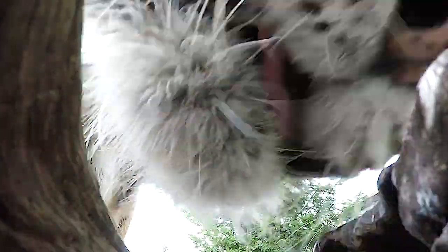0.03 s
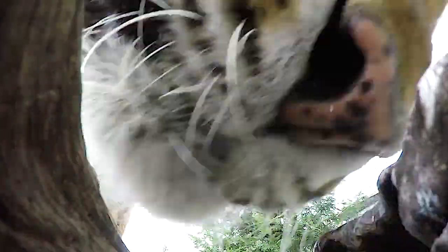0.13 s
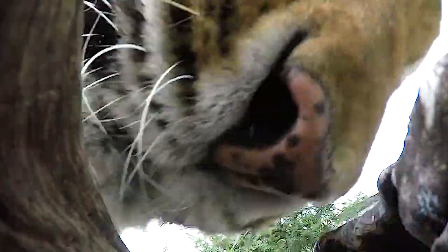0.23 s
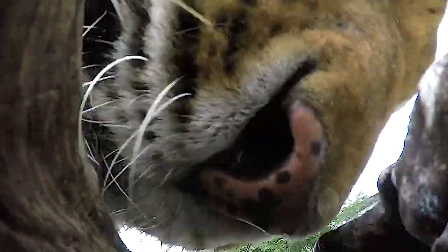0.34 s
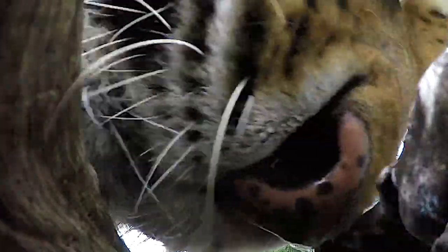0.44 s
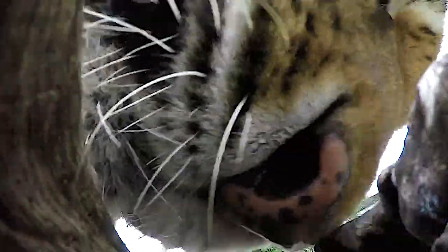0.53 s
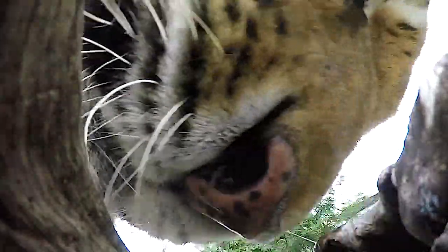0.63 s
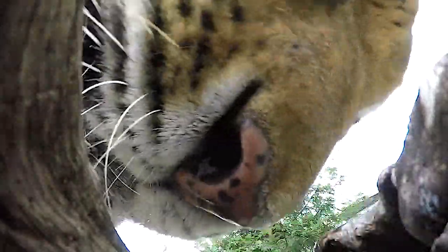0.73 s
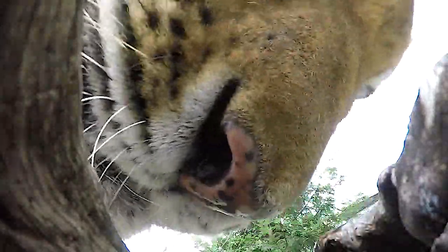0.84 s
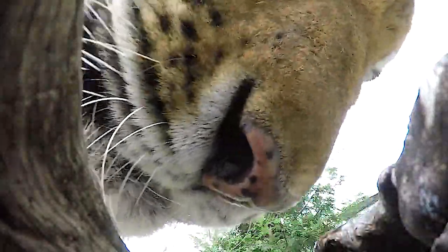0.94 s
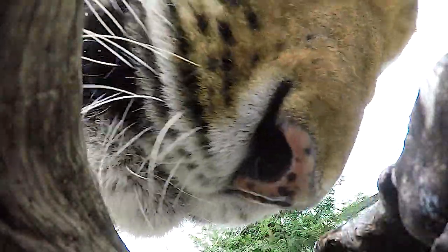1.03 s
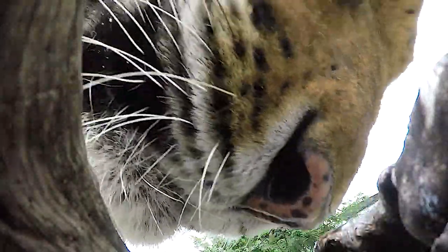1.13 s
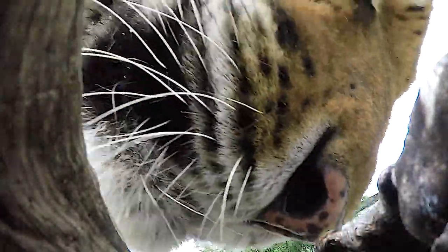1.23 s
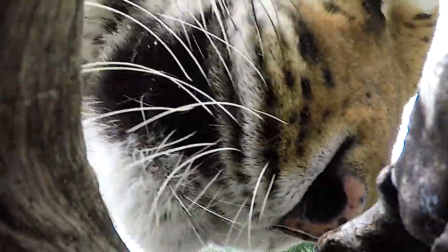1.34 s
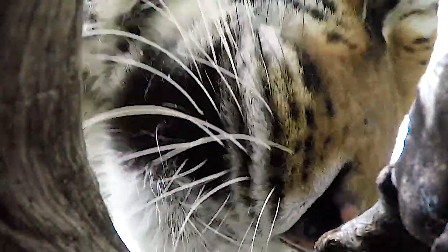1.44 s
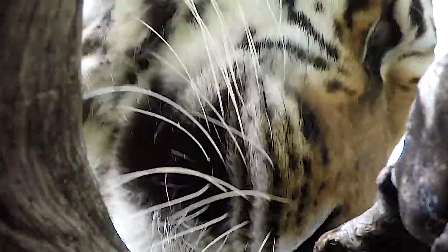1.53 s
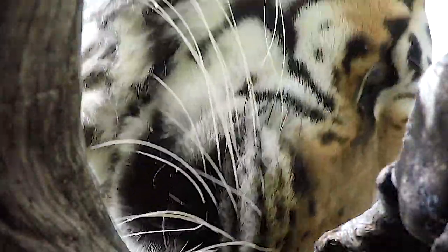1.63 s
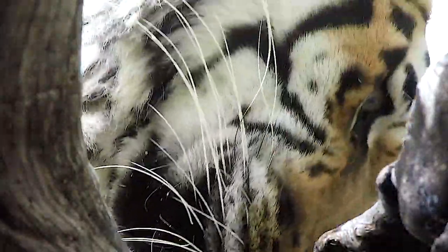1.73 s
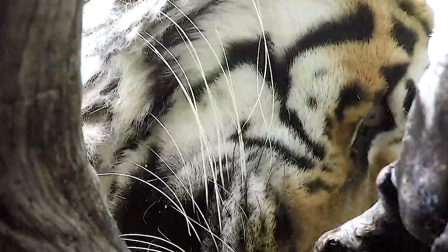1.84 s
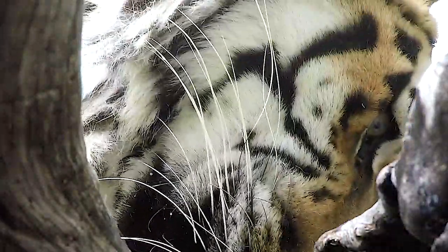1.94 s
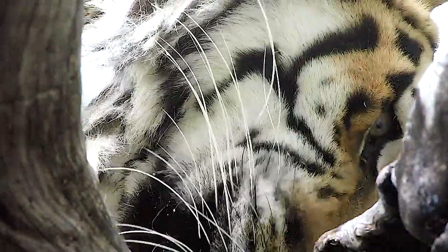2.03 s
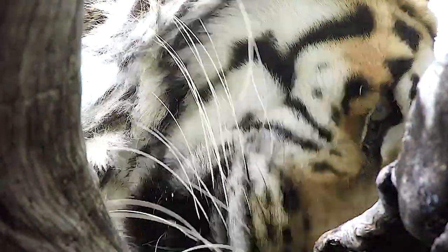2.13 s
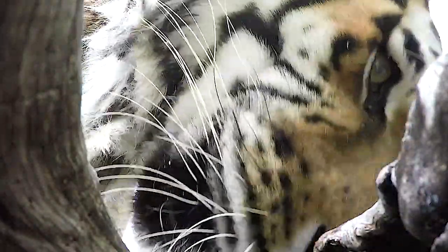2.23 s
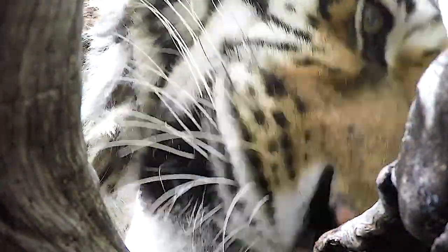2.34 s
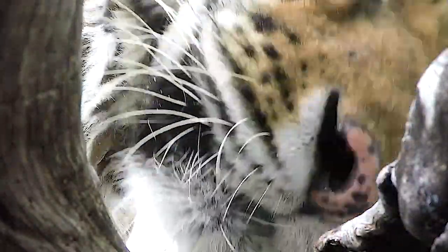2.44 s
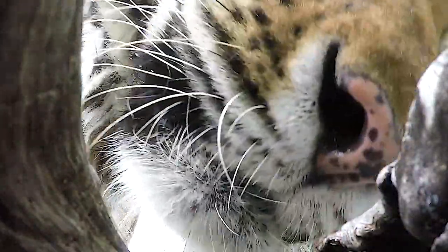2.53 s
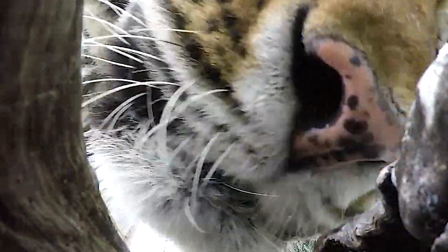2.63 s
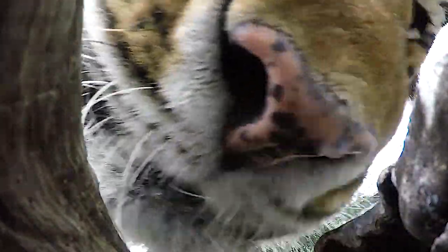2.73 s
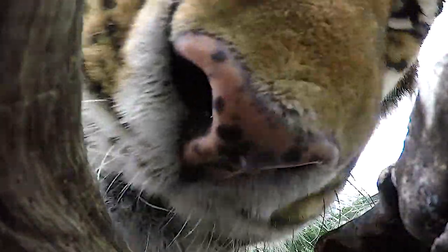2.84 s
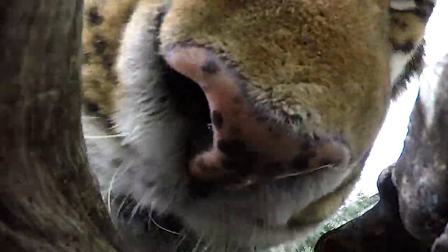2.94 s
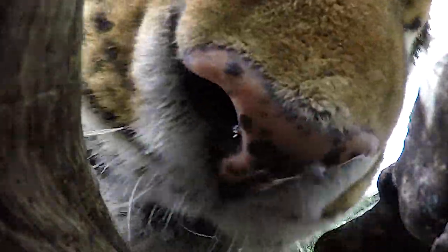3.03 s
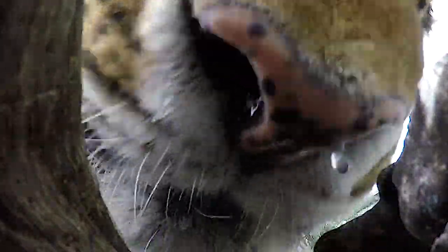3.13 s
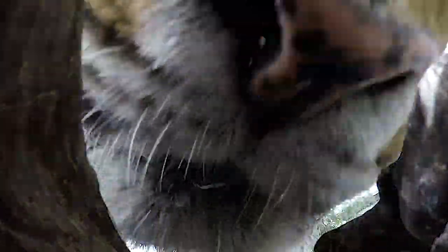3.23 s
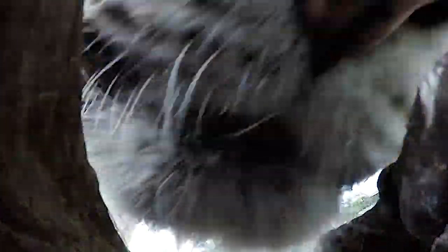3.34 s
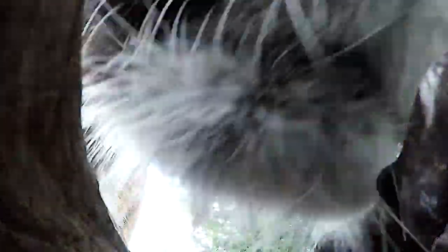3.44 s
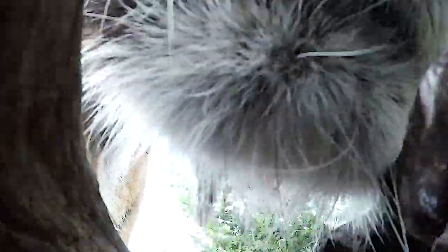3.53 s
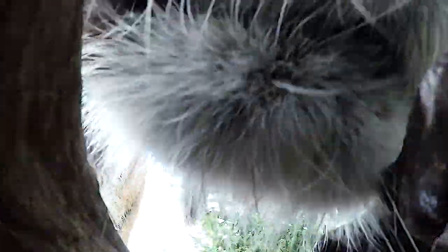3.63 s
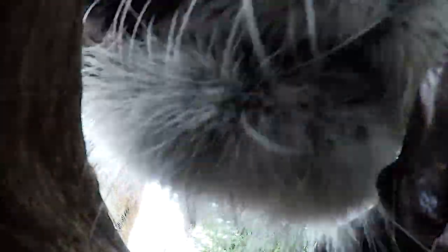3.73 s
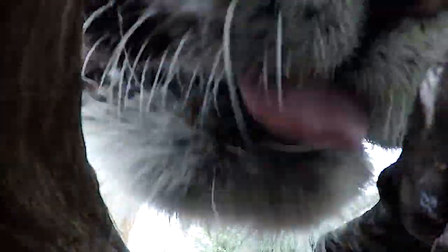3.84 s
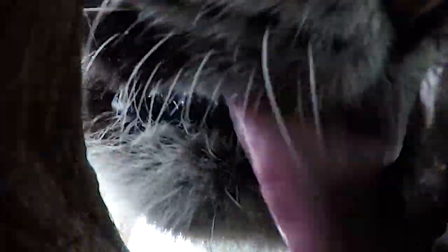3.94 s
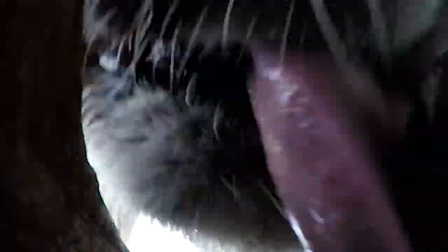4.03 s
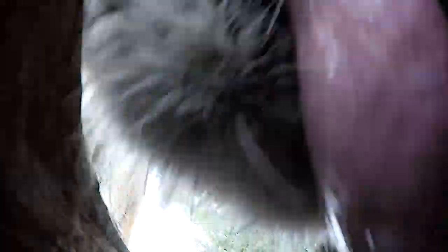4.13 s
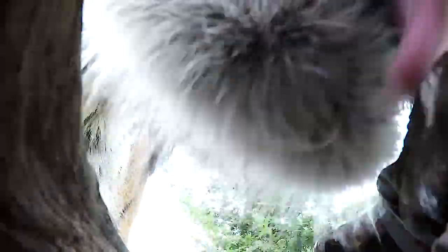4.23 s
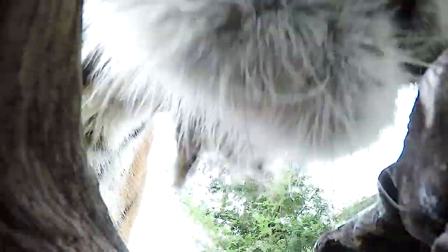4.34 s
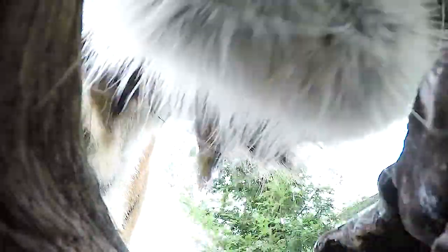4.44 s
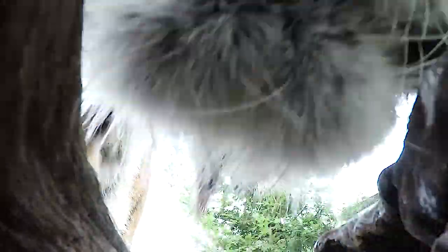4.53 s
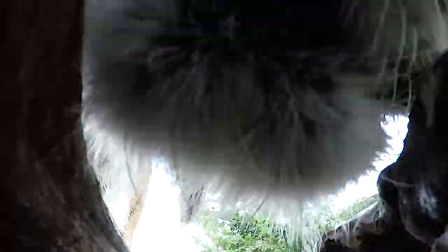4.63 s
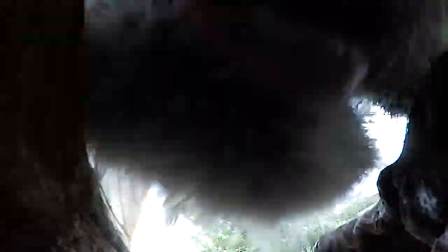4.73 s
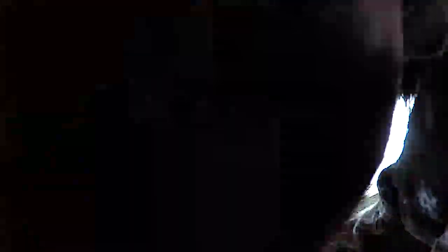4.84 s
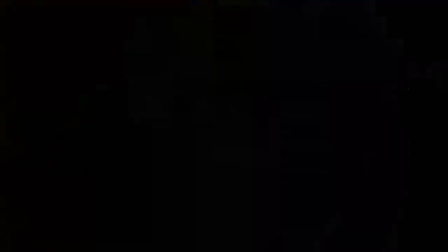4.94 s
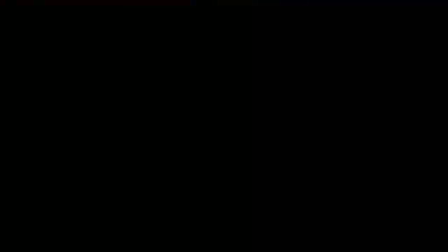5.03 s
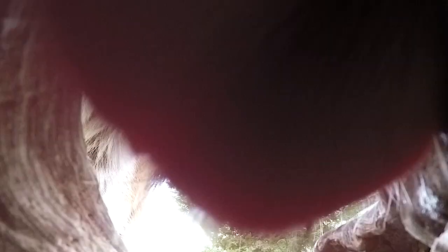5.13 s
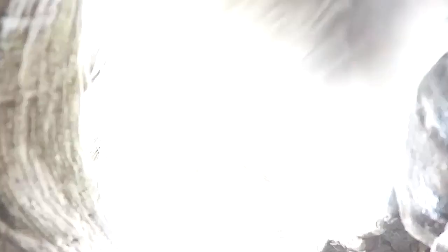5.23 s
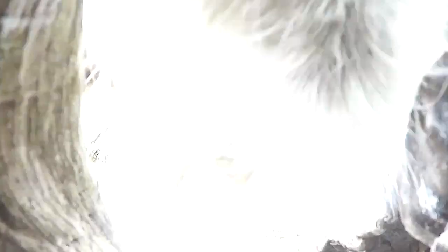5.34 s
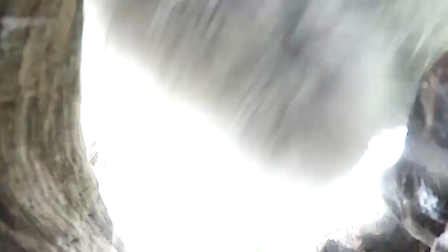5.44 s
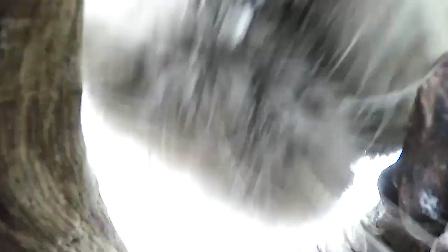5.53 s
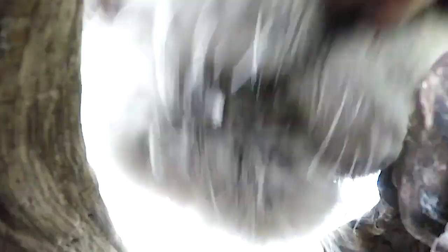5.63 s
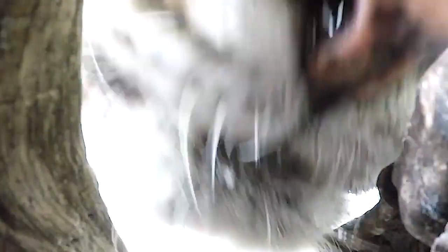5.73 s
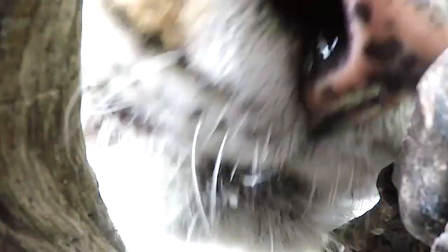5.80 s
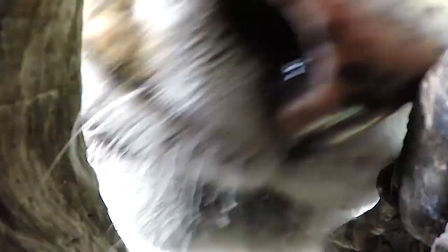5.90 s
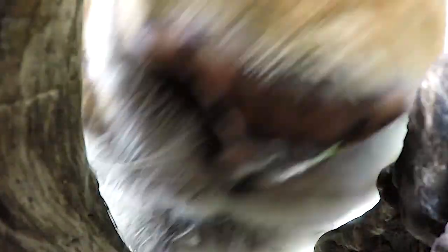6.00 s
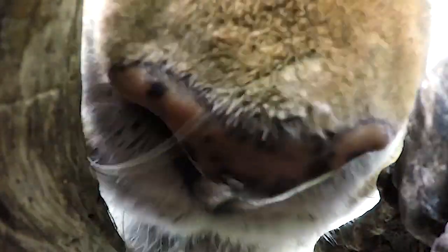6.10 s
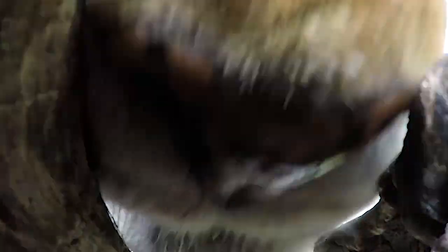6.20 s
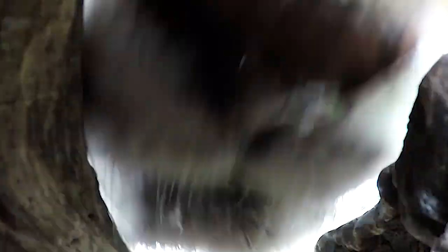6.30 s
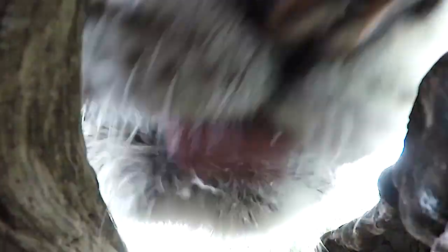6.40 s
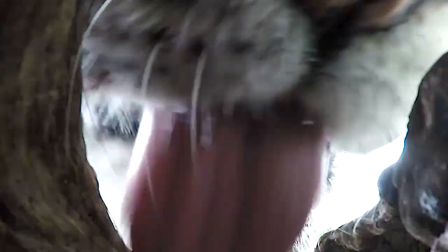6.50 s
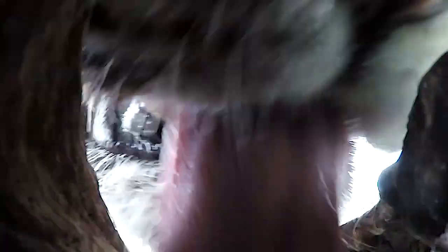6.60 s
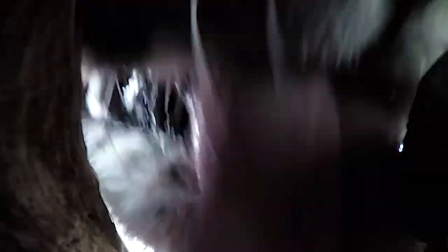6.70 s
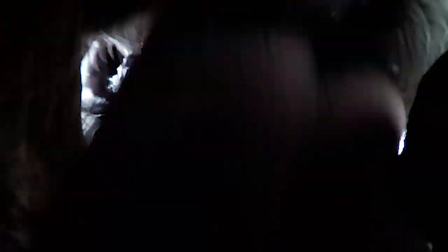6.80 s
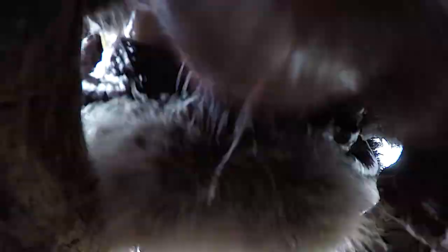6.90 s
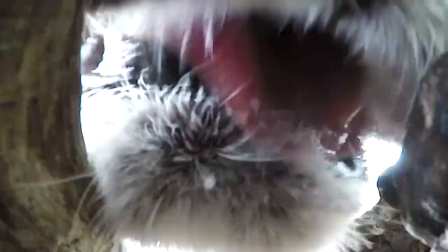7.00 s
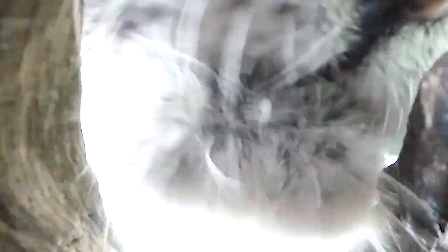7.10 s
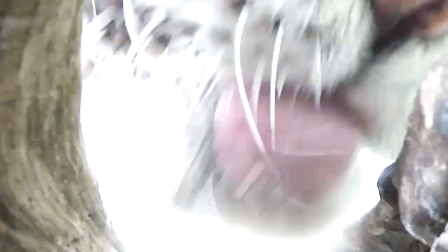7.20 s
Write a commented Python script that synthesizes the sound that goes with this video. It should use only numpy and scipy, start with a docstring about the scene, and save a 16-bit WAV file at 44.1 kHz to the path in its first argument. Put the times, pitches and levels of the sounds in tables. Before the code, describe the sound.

Big cat mouth and nose sounds at touching distance, dry and without echo: a light lick and saliva crackle, several soft nostril sniffs over a low wavering hum, then a blunt snort with a rasping lick. The loudest tongue stroke sticks and slips across the microphone, followed by a short quiet gap, then thumps, a second snort, wet rasping and a final cluster of sharp smacks over faint outdoor hiss.

```python
"""A tongue rasps past and wet lips smack: a tiger noses and licks a small camera wedged between logs outdoors.
Its housing drones at a hollow resonance when brushed, as low noise bands over a faint outdoor hiss.
Snuffs and snorts are shaped air noise, rasps are barb clicks on film noise, and smacks are crackles that ring bubbles.
Muzzle and jaw bump as decaying sines; one drag right over the microphone ports sticks, slips and judders."""
import sys
import numpy as np
from scipy import signal
from scipy.fft import rfft, irfft, next_fast_len
from scipy.io import wavfile
from scipy.ndimage import uniform_filter1d

SR = 44100
rng = np.random.default_rng(int(sys.argv[2]) if len(sys.argv) > 2 else 0)


def materialize(psi):
    """Save the field psi as 16-bit PCM at rate SR to the path in sys.argv[1].

    A 1-D psi becomes a single channel; in a 2-D psi each row is a channel.
    """
    bounded = np.clip(np.atleast_2d(psi).T, -1, 1)
    quanta = np.round(bounded * 32767).astype(np.int16)
    wavfile.write(sys.argv[1], SR, quanta)


N = 320166   # length in samples

# Snuffs from a little way off; air that reaches the housing makes it drone. Levels are before each layer's trim.
# Each row: start in seconds, length in seconds, air in dB, hollow note in dB, drone in dB,
# how squarely the nose faces the ports (0-1).
SNUFFS = [(.37, 0.14, -59, -74, -40, .1), (0.736, 0.15, -50, -42.5, -23.5, 0.2),
          (1.07, .16, -60.5, -65, -50, 0), (1.546, 0.076, -54.5, -55.5, -28.5, 0.2),
          (1.692, 0.086, -61, -64, -45, 0.16), (2.255, .19, -42.5, -45, -22.5, 0.37),
          (2.543, 0.09, -59.5, -70, -33.5, .02), (2.97, 0.13, -61, -73, -60, 0.5),
          (3.214, 0.039, -49.5, -51, -20, 0.9), (3.336, 0.085, -56, -70, -49, .95)]
# Snorts straight on to the housing. Each row: start in seconds, length in seconds, fall by 20 dB in seconds,
# air in dB, drone in dB, rumble in dB, all before each layer's trim.
SNORTS = [(4.158, 0.16, 0.096, -29, -11.5, -35.5), (6.357, 0.23, 0.3, -26.5, -13.5, -35)]
# Tongue strokes, a firm press within a longer light touch. Each row: press start in seconds, length in seconds,
# level in dB, growth along the press in dB, touch before it in seconds, touch after it in seconds, touch level in dB,
# barb flicks per second, lean of the treble to the left in dB.
LICKS = [(0, 0.13, -45, -1, 0, 0.1, -55.5, 2800, 0.5),
         (4.154, 0.087, -29.5, 1.5, 0.23, 0.16, -46.5, 3300, 7.5),
         (4.781, 0.067, -48.5, 0, 0.12, .06, -58, 2900, 6),
         (4.976, 0.24, -28.5, -1.5, 0.019, .005, -50, 3000, 7),
         (6.741, 0.178, -34.5, 10.5, 0.0054, 0.086, -43, 1550, 2)]
# How the two ports hear a source. Each row: frequency in Hz, likeness of the ports (0-1),
# phase lead of the left in radians. First the tongue on the ports, then air from a little way off, then air close on.
TOUCH_IMAGE = [(300, 0.72, 3.5), (1290, 0.91, 2.5), (2880, 1, 1.1), (5300, 0.49, -1), (14000, 0.13, 1.5)]
SNUFF_IMAGE = [(300, 0.98, 0), (1200, 0.86, -0.12), (2630, 0.97, -1.2), (5230, 0.63, 0.77), (14000, .2, 0)]
SNORT_IMAGE = [(300, 1, -0.036), (800, 0.3, 0.2), (2000, 0.34, -1.1), (14000, 0.17, 0.17)]
# Spectrum of saliva crackle. Each row: frequency in Hz, relative level in dB per Hz.
SALIVA_COLOUR = [(600, 2), (1300, 2), (2000, -0.5), (2800, 0), (3700, -7.5), (5000, -3), (6500, -9.5),
                 (10000, -16)]

# rise and fall times span 20 dB
SNORT_RISE_S = 0.046
LICK_RISE_S, LICK_FALL_S = 0.031, 0.023
DRAG_S, DRAG_LENGTH_S = 4.968, 0.098   # the drag right on the ports


def from_db(db):
    """Decibels to gain."""
    return 10 ** (np.asarray(db) / 20)


def rms_one(x):
    """Scale to rms 1."""
    return x / np.sqrt(np.mean(x ** 2) + 1e-20)


def peak_one(x):
    """Scale to peak 1."""
    return x / (np.abs(x).max() + 1e-20)


def panned(db):
    """Left and right gains for a level difference."""
    return from_db(np.array([[.5], [-.5]]) * db)


def level(curve):
    """Gain at every sample along a level curve."""
    return from_db(np.interp(np.arange(N) / SR, *np.transpose(curve)))


def swell(s, length_s, db, rise_s, fall_s, arch_db=0, growth_db=0):
    """Gain of one gesture: it rises, holds with a bulge and a trend, and falls; rise and fall times span 20 dB."""
    first = max(int((s - 2 * rise_s) * SR), 0)
    last = min(int((s + length_s + 2 * fall_s) * SR), N)
    at = np.arange(first, last)
    t, gain = at / SR - s, np.zeros(N)
    along = np.clip(t / length_s, 0, 1) - .5
    edges_db = 20 * (np.maximum(-t, 0) / rise_s + np.maximum(t - length_s, 0) / fall_s)
    gain[at] = from_db(db - edges_db - arch_db * (2 * along) ** 2 + growth_db * along)
    return gain


def together(gains):
    """Unrelated pushes add in power."""
    return np.sqrt(sum(gain ** 2 for gain in gains))


def clumps(size, per_s, depth_db):
    """A gain that wanders at random, knot by knot."""
    knots = rng.standard_normal(int(size * per_s / SR) + 2)
    wander = np.interp(np.arange(size) * per_s / SR, np.arange(len(knots)), knots)
    return from_db(depth_db * wander)


def span(gain):
    """First sample and gain of the stretch that sounds, in whole quarter seconds."""
    block = SR // 4
    first, last = np.flatnonzero(gain)[[0, -1]] // block
    return first * block, gain[first * block:(last + 1) * block]


def add(out, start, sound):
    """Mix a sound in from a given sample on."""
    out[:, start:start + sound.shape[-1]] += sound[..., :max(N - start, 0)]


def at_bins(points, size, axis=1):
    """One column of a frequency table at every bin of a transform."""
    table = np.array(points, float)
    bins_hz = np.arange(size // 2 + 1) * SR / size
    return np.interp(np.log(bins_hz + 1), np.log(table[:, 0]), table[:, axis])


def coloured(x, colour):
    """Give a sound a smooth spectrum that drops 30 dB in the octave beyond each end; rms 1."""
    size = next_fast_len(x.shape[-1])
    closed = [(colour[0][0] / 2, colour[0][1] - 30), *colour, (colour[-1][0] * 2, colour[-1][1] - 30)]
    shaped = irfft(rfft(x, size) * from_db(at_bins(closed, size)), size)
    return rms_one(shaped[..., :x.shape[-1]])


def at_ports(three, image):
    """One shared and two private signals become what the left and right ports hear."""
    size = next_fast_len(three.shape[-1])
    spectra = rfft(three, size)
    alike, lead = np.clip(at_bins(image, size), 0, 1), at_bins(image, size, axis=2)
    shared = spectra[0] * np.exp(1j * lead * np.array([[.5], [-.5]]))
    pair = np.sqrt(alike) * shared + np.sqrt(1 - alike) * spectra[1:]
    return irfft(pair, size)[:, :three.shape[-1]]


def resonant(x, peaks):
    """Lift or dip narrow resonances in a sound, one after another."""
    for hz, width_hz, lift_db in peaks:
        r = np.exp(-np.pi * width_hz / SR)
        poles = [1, -2 * r * np.cos(2 * np.pi * hz / SR), r * r]
        peak = signal.lfilter([1, 0, -1], poles, x) * (1 - r * r) / 2
        x = x + (from_db(lift_db) - 1) * peak
    return x


def ring(x, hz, t60):
    """One decaying mode, set ringing by a sound."""
    r = from_db(-60 / (t60 * SR))
    return signal.lfilter([1, -1], [1, -2 * r * np.cos(2 * np.pi * hz / SR), r * r], x)


def band(x, low_hz, high_hz):
    """Causal band-pass."""
    edges_hz = [low_hz, min(high_hz, SR / 2 - 1000)]
    return signal.sosfilt(signal.butter(2, edges_hz, "band", fs=SR, output="sos"), x)


def flicks(size, per_s, spread_db, channels=3):
    """Random clicks of uneven strength; rms 1."""
    shape = (channels, size)
    strength = from_db(spread_db * np.minimum(rng.exponential(1, shape), 4)) * rng.choice([-1, 1], shape)
    return rms_one(strength * (rng.random(shape) < per_s / SR))


def held(x, seconds):
    """Even out the slow swells of a noise and keep its quick beating."""
    size = max(int(seconds * SR), 2)
    power = uniform_filter1d(uniform_filter1d(x ** 2, size), size)
    return x / np.sqrt(power + 1e-9)


def housing(drive, colour, level_db, even_s, apart_db):
    """Brushing shakes the housing as a whole, so both ports hear nearly the same."""
    out = np.zeros((2, N))
    start, gain = span(drive)
    noise = coloured(rng.standard_normal((2, len(gain))), colour)
    apart = from_db(apart_db) * noise[1] * [[1], [-1]]   # opposite at the two ports
    add(out, start, from_db(level_db) * gain * (held(noise[0], even_s) + apart))
    return out


def air(flow, colour, image, peaks, level_db):
    """Turbulent air through a set of resonances."""
    out = np.zeros((2, N))
    start, gain = span(flow)
    noise = coloured(at_ports(rng.standard_normal((3, len(gain))), image), colour)
    add(out, start, from_db(level_db) * gain * rms_one(resonant(noise, peaks)))
    return out


def grains(effort, colour, image, per_s, spread_db, level_db):
    """A stream of tiny clicks under one envelope, as of sticky releases."""
    out = np.zeros((2, N))
    start, gain = span(effort)
    releases = coloured(at_ports(flicks(len(gain), per_s, spread_db), image), colour)
    add(out, start, from_db(level_db) * gain * releases)
    return out


def outdoors():
    """The faint distant hiss is broad noise that dips for a moment after the drag."""
    # Each row: frequency in Hz, relative level in dB per Hz.
    hiss_colour = [(150, 8), (330, 3.5), (500, 1.5), (900, -2.5), (1250, -2.5), (2000, -11), (3100, -16),
                   (4400, -18.5), (5200, -19), (5750, -13.5), (6400, -19), (10000, -21.5), (12000, -28.5),
                   (15000, -38)]
    # Each row: time in seconds, level in dB before the trim.
    hiss_level = [(0, -46), (2, -47), (4.9, -44.5), (5.27, -48), (5.42, -49), (5.7, -45), (6.25, -45.5),
                  (7.26, -42.5)]
    # Each row: frequency in Hz, likeness of the ports (0-1), phase lead of the left in radians.
    hiss_image = [(300, .25, 5), (436, 0.65, -1.5), (650, 0.74, -3), (1180, 0.21, -2.5), (2700, 0.43, -1.6),
                  (14000, 0.072, 31)]
    return air(level(hiss_level), hiss_colour, hiss_image, [], level_db=0.5)


def body():
    """The housing drones and its mount rumbles: always a little, and more with every snuff, snort and shove."""
    # Spectra of drone and rumble. Each row: frequency in Hz, relative level in dB per Hz.
    drone_colour = [(70, -44), (105, -32), (140, -17), (172, -7), (202, -1), (232, -5.5), (270, -16.5),
                    (320, -26.5), (420, -40), (700, -52.5)]
    rumble_colour = [(22, -33), (32, -22), (45, -14.5), (65, -1.5), (90, -1.5), (135, 0), (250, -32)]
    # Resting drone, which sinks for a moment after the drag. Each row: time in seconds, level in dB before the trim.
    drone_rest = [(0, -31), (1.9, -31), (3.05, -31.5), (3.7, -27.5), (4.95, -28), (5.15, -40),
                  (5.34, -40.5), (5.46, -31.5), (6.1, -28), (7.26, -31)]
    # Resting rumble of the mount, stronger as the head leans closer. Each row: time in seconds, level in dB.
    rumble_rest = [(0, -47), (.7, -47), (1.95, -59), (3.2, -45.5), (4.7, -41), (5.25, -46.5), (6.25, -42.5),
                   (6.8, -37), (7.26, -41.5)]
    # The muzzle shoves the housing. Each row: start in seconds, length in seconds, drone in dB before the trim,
    # rumble in dB.
    shoves = [(0.227, 0.092, -26.5, -52), (3.794, 0.063, -19, -35), (4.352, .045, -36, -26.5),
              (4.972, 0.1, -23.5, -31), (5.689, 0.072, -22.5, -36.5), (6.917, 0.012, -22.5, -46),
              (6.993, 0.13, -28, -44)]
    wavers_per_s, waver_db = 13, 1.74   # the resting drone wavers
    lag_s, rise_s, fall_s = 0.014, 0.029, 0.06   # the housing answers a snuff a little late
    shove_rise_s, shove_fall_s = .035, 0.064

    drone = [level(drone_rest) * clumps(N, wavers_per_s, waver_db)]
    rumble = [level(rumble_rest)]
    for s, length, _, _, drone_db, _ in SNUFFS:
        drone.append(swell(s + lag_s, length, drone_db, rise_s, fall_s, growth_db=-2))
    for s, length, fall, _, drone_db, rumble_db in SNORTS:
        drone.append(swell(s, length, drone_db, SNORT_RISE_S, fall, arch_db=0.5))
        rumble.append(swell(s, length, rumble_db, SNORT_RISE_S, fall, growth_db=-8))
    for s, length, drone_db, rumble_db in shoves:
        push = swell(s, length, 0, shove_rise_s, shove_fall_s)
        drone.append(from_db(drone_db) * push)
        rumble.append(from_db(rumble_db) * push)
    return (housing(together(drone), drone_colour, level_db=-1.5, even_s=0.037, apart_db=-23.0)
            + housing(together(rumble), rumble_colour, level_db=0.0, even_s=0.014, apart_db=-22))


def bumps(soft_s=0.0057):
    """Padded knocks of muzzle and jaw swell softly and die away in the housing as decaying sines."""
    # Each row: start in seconds, peak of the envelope in dB before the band-pass, frequency in Hz, t60 in seconds.
    knocks = [(.143, -17, 210, 0.044), (0.244, -11.5, 214, 0.043), (.312, -21.5, 201, 0.067),
              (0.765, -22, 197, 0.14), (3.435, -26, 210, .06), (3.788, -15, 210.4, 0.14),
              (3.836, -24, 150, 0.026), (4.368, -22, 90, 0.064), (5.04, -14.5, 131, 0.052),
              (5.695, -13, 197, 0.098), (6.425, -15, 134, 0.043), (6.477, -4, 170, 0.022),
              (6.585, -13.5, 155, 0.018), (6.927, -12, 190, 0.073), (6.985, -15.5, 111, 0.021),
              (7.079, -14.5, 132, 0.033), (7.168, -13.5, 204, 0.039)]
    out, t = np.zeros((2, N)), np.arange(SR // 5) / SR
    for s, db, hz, t60 in knocks:
        envelope = (1 - np.exp(-(t / soft_s) ** 2)) * from_db(-60 * t / t60)
        add(out, int(s * SR), from_db(db) * envelope / envelope.max() * np.sin(2 * np.pi * hz * t))
    return band(out, low_hz=76.6, high_hz=2000)   # keep the knocks free of deep bass


def nose():
    """Snuffs hiss through the nostrils over a hollow note; snorts blow straight on to the case and buffet the ports."""
    # Spectra of a snuff past the ports, one aimed squarely at them (it misses the nostril resonances),
    # the hollow note, and the buffet of a snort. Each row: frequency in Hz, relative level in dB per Hz.
    snuff_colour = [(200, -31), (330, 0), (480, 4), (600, -17), (900, -23.5), (1400, -2.5), (1900, -13),
                    (2800, -6), (3300, -30), (4500, -16.5), (7500, -14.5), (10000, -18), (14000, -41)]
    square_colour = [(330, 7), (480, 4), (750, -13), (1400, -3.5), (2400, -11), (3100, -9.5), (3800, -12.5),
                     (5600, -8.5), (9500, -18), (14000, -38)]
    hollow_colour = [(300, 11), (380, 6), (600, -17.5), (700, -3), (900, -25), (1110, 1.5), (1400, -14),
                     (1800, -25)]
    buffet_colour = [(90, -14), (135, 5), (165, 3), (220, -22.5), (500, -65)]
    # One such spectrum for each snort, with the same columns.
    snort_colours = [
        [(200, -10), (320, -2), (470, 5), (600, -11), (880, -14.5), (1300, -11), (2300, -26), (3600, -30),
         (4700, -32), (5700, -19.5), (8000, -31), (11000, -42), (14000, -57)],
        [(160, -34), (280, -14), (294, -13), (359, 1.5), (404, -6.5), (439, -1.5), (722, -20.5), (1290, -22.5),
         (1450, -20.5), (1890, -31.5), (3810, -29), (5770, -29.5), (7400, -38), (12600, -48.5), (14900, -64)],
    ]
    # Resonances of the nostrils. Each row: frequency in Hz, width in Hz, lift in dB.
    nostrils = [(760, 81, 17), (1125, 130, 9.5), (2490, 180, 11.5), (3800, 120, 16.5), (5600, 290, 7)]
    rise_s, fall_s, arch_db = 0.058, 0.057, 4.5   # the arch is the bulge at mid-length
    hollow_rise_s, hollow_fall_s = 0.2, 0.084   # the slack nostril opens before the snuff and closes after it

    past, square, slack = [], [], []
    for s, length, db, hollow_db, _, facing in SNUFFS:
        flow = swell(s, length, db, rise_s, fall_s, arch_db)
        facing = np.clip(facing, .01, .99)
        past.append(flow * np.sqrt(1 - facing))
        square.append(flow * np.sqrt(facing))
        slack.append(swell(s, length, hollow_db, hollow_rise_s, hollow_fall_s, arch_db=5))
    out = (air(together(past), snuff_colour, SNUFF_IMAGE, nostrils, level_db=6.0)
           + air(together(square), square_colour, SNUFF_IMAGE, [], level_db=5.5)
           + air(together(slack), hollow_colour, SNUFF_IMAGE, [], level_db=6.5))
    for (s, length, fall, db, drone_db, _), colour in zip(SNORTS, snort_colours):
        blast = swell(s, length, 0, SNORT_RISE_S, fall, arch_db=6.5)
        out += air(from_db(db) * blast, colour, SNORT_IMAGE, [], level_db=2)
        # the buffet's level is set against the snort's drone
        out += housing(from_db(drone_db) * blast, buffet_colour, level_db=-11.5, even_s=0.017, apart_db=-20)
    return out


def coat():
    """Fur sweeps past the case as soft noise and whiskers graze a port as dense clicks."""
    # Spectra of fur and whiskers. Each row: frequency in Hz, relative level in dB per Hz.
    fur_colour = [(1500, 11), (3500, -18), (7000, -26), (8500, 3), (10000, 0), (11500, -11), (14000, -18)]
    whisker_colour = [(700, 1), (1200, 0), (1600, -5), (2400, -19), (6000, -17), (12000, -35)]
    # Each row: start in seconds, length in seconds, level in dB before the trim.
    fur_sweeps = [(5.455, 0.37, -60.5), (6.351, .045, -49.5)]
    edge_share = 0.77   # a longer sweep also fades in and out more slowly
    sweeps = together(swell(s, length, db, edge_share * length, edge_share * length, arch_db=2)
                      for s, length, db in fur_sweeps)
    graze = swell(0.538, length_s=0.017, db=-46, rise_s=0.063, fall_s=0.063)
    return (air(sweeps, fur_colour, SNUFF_IMAGE, [], level_db=1.5)
            + grains(graze, whisker_colour, TOUCH_IMAGE, per_s=2400, spread_db=1.0, level_db=0.5))


def mouth():
    """Each move of the tongue in the mouth squelches low and crackles with saliva, both streams of clicks."""
    # Each row: frequency in Hz, relative level in dB per Hz.
    squelch_colour = [(220, -15), (330, -3.5), (470, 0.5), (650, -15.5), (1000, -20), (1600, -30)]
    # Each row: start in seconds, length in seconds, squelch in dB, saliva crackle in dB, both before the trims.
    mouthings = [(0, .015, -53, -62), (0.093, .012, -39.5, -42.5), (0.216, 0.13, -46, -49),
                 (3.818, 0.022, -37.5, -45), (4.487, .01, -40.5, -60), (5.464, .03, -43.5, -53),
                 (5.599, 0.17, -49, -72), (6.811, 0.16, -42.5, -42.5), (7.05, 0.023, -39.5, -43.5),
                 (7.129, 0.022, -34.5, -49), (7.25, .02, -43, -39)]
    rise_s, fall_s = 0.024, 0.039
    squelches, crackles = [], []
    for s, length, squelch_db, saliva_db in mouthings:
        move = swell(s, length, 0, rise_s, fall_s, arch_db=-2.5)
        squelches.append(move * from_db(squelch_db))
        crackles.append(move * from_db(saliva_db))
    squelch, saliva = together(squelches), together(crackles)
    # squelch, lone saliva ticks and fine crackle sound together
    return (grains(squelch, squelch_colour, SNORT_IMAGE, per_s=700, spread_db=4.0, level_db=0.5)
            + grains(saliva, SALIVA_COLOUR, SNORT_IMAGE, per_s=76, spread_db=3.0, level_db=-10)
            + grains(saliva, SALIVA_COLOUR, SNORT_IMAGE, per_s=800, spread_db=3.0, level_db=-2.0))


def lips():
    """Lone threads of saliva break as sparse ticks while the wet lips hover over the ports."""
    # Each row: frequency in Hz, relative level in dB per Hz.
    lip_colour = [(1500, -4), (3000, 0), (7500, -1), (11000, -12), (14000, -18)]
    near = swell(3.3, length_s=1.2, db=-62, rise_s=0.092, fall_s=0.092)
    return grains(near, lip_colour, SNORT_IMAGE, per_s=14, spread_db=0.0, level_db=0)


def smacks(below=0.53, above=2.54, top_hz=10000, pops_per_s=7000, own_share=1.0):
    """A saliva film tears in a short crackle that sets its bubble ringing; bigger bubbles crackle lower."""
    # Each row: start in seconds, bubble peak in dB before panning, bubble in Hz, ring t60 in seconds,
    # crackle t60 in seconds, crackle against the bubble in dB, left over right in dB.
    wet_smacks = [(0.09, -28.5, 1220, 0.024, 0.02, 9.5, 3), (.091, -23.5, 5360, 0.0021, 0.012, -12, 0),
                  (0.092, -29.5, 2900, 0.036, .03, -10, -4), (0.1118, -23, 2540, 0.0083, 0.023, 2, -3),
                  (.14, -36.5, 7300, .01, 0.022, 3, 0), (0.265, -25, 1030, 0.0027, 0.015, -4, 5),
                  (0.2643, -28, 4900, .008, 0.0063, -15, 5), (.314, -31, 826, 0.0097, 0.037, 2, 1),
                  (3.521, -34, 7270, 0.0085, 0.0056, 2.5, 5), (3.7457, -37, 7150, 0.013, 0.0078, -9, 11),
                  (3.823, -20.5, 1510, .003, 0.009, -3, 5), (3.838, -35, 2420, 0.01, .01, -7, 3),
                  (4.065, -40, 3020, 0.014, 0.016, 3, 1), (4.3241, -17.5, 7700, .005, 0.005, -6, -2),
                  (4.49, -31.5, 970, .01, 0.019, 0, 8.5), (4.7248, -33.5, 1230, 0.0086, 0.058, 0, 3),
                  (4.74, -33.5, 1390, 0.0074, 0.028, 5, 7), (4.818, -32, 4350, 0.0057, 0.012, -5, 4),
                  (6.3982, -25.5, 950, .012, 0.029, 6, 2), (6.58, -30.5, 4060, 0.022, .008, -7, 0),
                  (6.757, -33.5, 6800, .012, .02, -11, 6), (6.925, -29, 2300, 0.0083, 0.064, 10, 2),
                  (7.048, -30, 1700, 0.0061, 0.014, 7, 2), (7.063, -37, 1020, 0.0053, 0.011, 10.5, 6),
                  (7.118, -30, 734, 0.016, 0.042, -14, 5), (7.1357, -26.5, 870, 0.014, 0.017, -1, 9),
                  (7.1465, -30, 940, 0.031, 0.0099, -19, 19), (7.147, -31.5, 4680, .015, 0.036, -5, -2),
                  (7.171, -31, 2100, 0.003, 0.024, 2, 6), (7.188, -38, 2200, .0046, 0.017, 1, 1),
                  (7.193, -12, 2660, 0.0048, 0.0039, -11.5, 1), (7.192, -22.5, 1330, 0.012, 0.0034, -16, 1),
                  (7.197, -30, 1380, .007, 0.0082, 3, 3), (7.224, -30, 1860, 0.0045, 0.0089, -4, 12)]
    out, t = np.zeros((2, N)), np.arange(SR // 10) / SR
    for s, db, hz, ring_t60, crackle_t60, crackle_db, left_db in wet_smacks:
        pops = flicks(len(t), pops_per_s, spread_db=2.0) * clumps(len(t), per_s=186, depth_db=2.5)
        pops[0, 0] += 3     # the first tear is a strong one
        pops = (pops[0] + own_share * pops[1:]) * from_db(-60 * t / crackle_t60)
        crackle = peak_one(band(pops, min(hz * below, top_hz / 2), min(hz * above, top_hz)))
        bubble = peak_one(band(ring(pops, hz, ring_t60), hz * 0.54, hz * 1.48))
        add(out, int(s * SR), from_db(db) * panned(left_db) * (bubble + from_db(crackle_db) * crackle))
    return out


def licks(spread_db=2.0, film_db=-4, treble_hz=4000, grips_per_s=140, grip_db=3.0):
    """Tongue barbs flick over the case in clumps, as patches grip and let go, on the hiss of a wet film."""
    # One spectrum for each stroke. Each row: frequency in Hz, relative level in dB per Hz.
    lick_colours = [
        [(900, -9), (1300, 0), (2000, -11), (2800, -2), (3600, -9), (7300, 1.5), (10500, -5.5), (12000, -16),
         (14500, -30)],
        [(800, -3.5), (1400, 4.5), (2000, -7), (3000, -2), (3500, -8), (4700, -6.5), (7000, -4), (10300, -12),
         (11700, -23), (14000, -29)],
        [(530, -33), (900, 2), (2530, -8), (3050, -4), (3430, -9), (5490, -1), (9200, -7), (14900, -39)],
        [(600, -29), (1100, 1), (1500, -1), (2300, -7.5), (3200, -1.5), (3800, -7.5), (5200, -2), (7500, -7),
         (10300, -9), (11500, -18), (13800, -22), (14800, -45)],
        [(410, -35), (700, -10), (989, -15), (1210, 4.5), (1690, -15), (1830, -10), (2130, -28), (2970, -18.5),
         (4830, -16), (6000, -10), (8920, -20.5), (13800, -25), (14900, -34)],
    ]
    # Resonances of the gap between tongue and port. Each row: frequency in Hz, width in Hz, lift in dB.
    port_gap = [(1380, 88, -0.5), (1580, 45, 6.5), (2225, 68, 10.5), (2600, 98, 5.5), (3125, 48, 6),
                (5020, 140, 4.5), (6060, 90, -6)]
    for_treble = signal.butter(1, treble_hz, "high", fs=SR, output="sos")
    out = np.zeros((2, N))
    for stroke, colour in zip(LICKS, lick_colours):
        s, length, db, growth_db, before, after, touch_db, per_s, left_db = stroke
        press = swell(s, length, db, LICK_RISE_S, LICK_FALL_S, arch_db=0.5, growth_db=growth_db)
        # the light touch firms up along the stroke
        touch = swell(s - before, before + length + after, touch_db, LICK_RISE_S, LICK_FALL_S, growth_db=4.5)
        start, gain = span(together([press, touch]))
        barbs = flicks(len(gain), per_s, spread_db) * clumps(len(gain), grips_per_s, grip_db)
        film = from_db(film_db) * rng.standard_normal((3, len(gain)))
        rasp = resonant(coloured(at_ports(barbs + film, TOUCH_IMAGE), colour), port_gap)
        # the nearer port gets more of the treble
        treble = signal.sosfilt(for_treble, rasp)
        add(out, start, gain * rms_one(rasp + (panned(left_db) - 1.5) * treble))
    return out


def snags():
    """Now and then a coarse barb catches, which makes the press of the tongue gritty."""
    presses = together(swell(s, length, db, LICK_RISE_S, LICK_FALL_S, growth_db=growth_db)
                       for s, length, db, growth_db, *_ in LICKS)
    grit = grains(presses, SALIVA_COLOUR, TOUCH_IMAGE, per_s=260, spread_db=2.0, level_db=-12)
    return band(grit, low_hz=1500, high_hz=6500) * panned(2.6)


def slips(count=12, step_t60=0.016, snap_t60=0.016, snap_low_hz=900, snap_high_hz=2400, left_db=3):
    """The tongue slips unevenly: each release is a pressure step, out of step at the ports, and a dull snap."""
    jitter, arch_db = 0.251, 1.5   # the jitter is a share of the gap between slips
    low_hz, high_hz = 169, 507
    step_db, step_db_per_octave, snap_db = -1, -4, -13.5   # slower slips step harder
    out, t = np.zeros((2, N)), np.arange(SR // 20) / SR
    for k, hz in enumerate(rng.permutation(np.geomspace(low_hz, high_hz, count))):
        along = (k + jitter * rng.uniform(-1.054, 1)) / count
        lag = np.array([[0], [1]]) * rng.uniform(1.0, 3.0)   # radians, at the right port
        step = np.sin(2 * np.pi * hz * t - lag) * from_db(-60 * t / step_t60) * (1 - np.exp(-8 * hz * t))
        tear = at_ports(rng.standard_normal((3, len(t))), TOUCH_IMAGE) * from_db(-60 * t / snap_t60)
        snap = peak_one(band(band(tear, snap_low_hz, snap_high_hz), snap_low_hz / 2, snap_high_hz))
        this_step_db = step_db + step_db_per_octave * np.log2(hz / low_hz)
        release = from_db(this_step_db) * step + from_db(snap_db) * snap
        arch = from_db(-arch_db * (2 * along - 1) ** 2)
        add(out, int((DRAG_S + along * DRAG_LENGTH_S) * SR), arch * panned(left_db) * release)
    return out


def drag():
    """The tongue judders hard between its slips, then lightly as it slides off the ports."""
    # Each row: frequency in Hz, relative level in dB per Hz.
    judder_colour = [(40, -28), (120, -3), (340, 4.5), (480, -1), (1000, -8), (1250, -13), (1600, -1),
                     (2100, -12), (2700, -17), (3600, -42), (7000, -42)]
    rise_s = 0.016
    grip = swell(DRAG_S, DRAG_LENGTH_S, -17, rise_s, fall_s=0.057, arch_db=15)
    slide = swell(DRAG_S, 0.242, -36.5, rise_s, LICK_FALL_S)
    judder = grains(together([grip, slide]), judder_colour, TOUCH_IMAGE, per_s=730, spread_db=-0.5, level_db=2.0)
    return judder * panned(2.2) + band(slips(), low_hz=90, high_hz=6000)


def scene():
    """Everything but the outdoor hiss happens within a hand's width of the ports, so there is no echo."""
    background = outdoors() + body() + bumps()
    muzzle = nose() + coat() + mouth() + lips() + smacks()
    tongue = licks() + snags() + drag()
    return background + muzzle + tongue


def record(dry):
    """The image narrows and reopens, the highest peaks are rounded and the top is cut."""
    # The stereo image closes to mono for a while after the drag. Each row: time in seconds, side level in dB.
    side_level = [(0, 0), (5.23, 0), (5.3, -9), (6.0, -45), (6.6, -56), (6.77, -3), (7.26, -3.5)]
    cutoff_hz = 14800
    mid, side = (dry[0] + dry[1]) / 2, (dry[0] - dry[1]) / 2
    pair = mid + level(side_level) * side * [[1], [-1]]
    rounded = pair / (1 + (pair / .9) ** 4) ** .25
    return signal.sosfilt(signal.ellip(10, .1, 90, cutoff_hz, fs=SR, output="sos"), rounded)


dry = scene()
out = record(dry)
materialize(out)
```